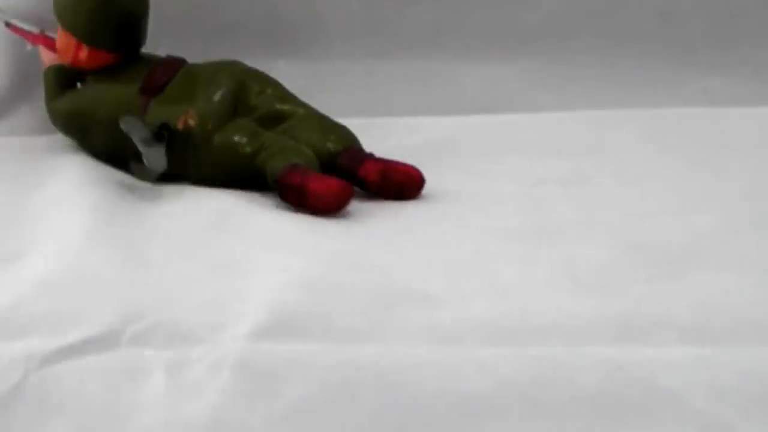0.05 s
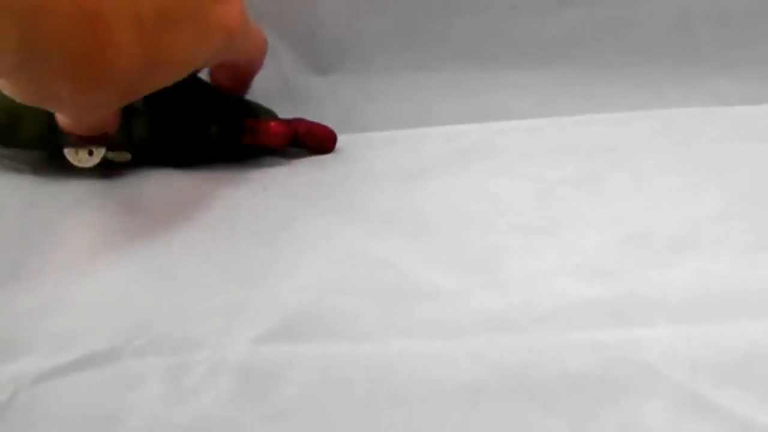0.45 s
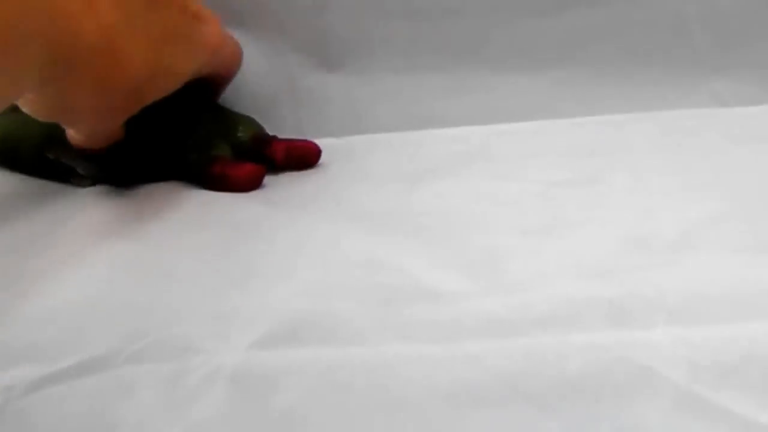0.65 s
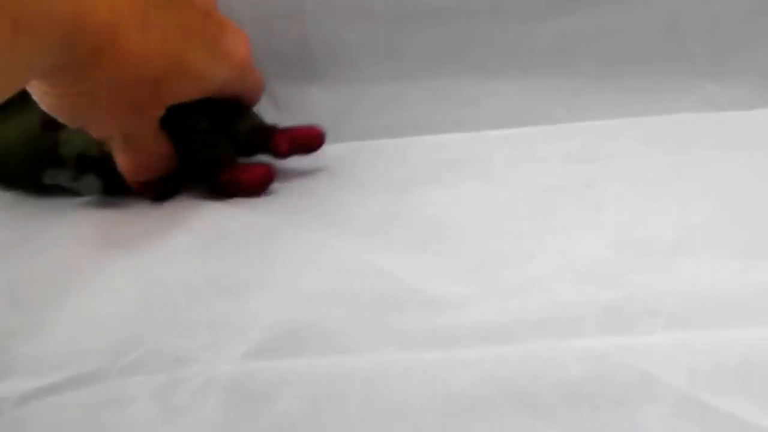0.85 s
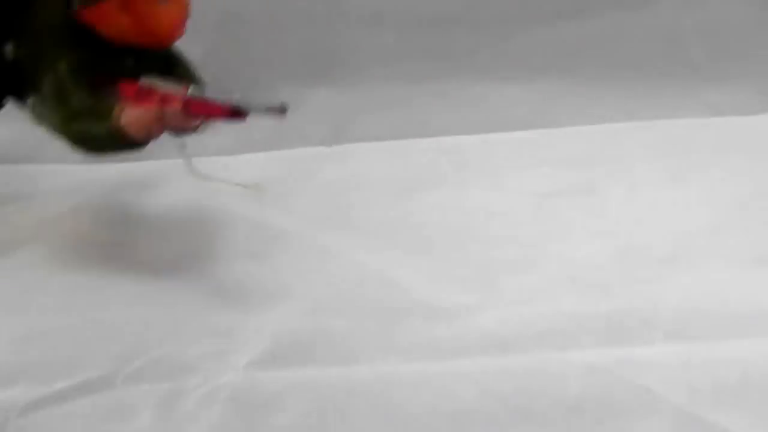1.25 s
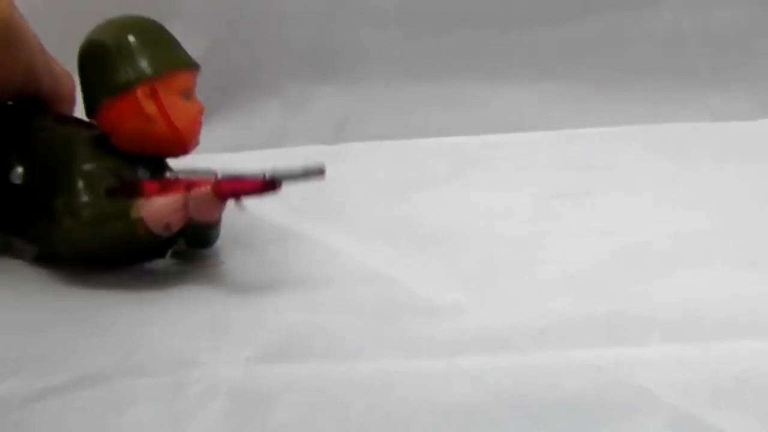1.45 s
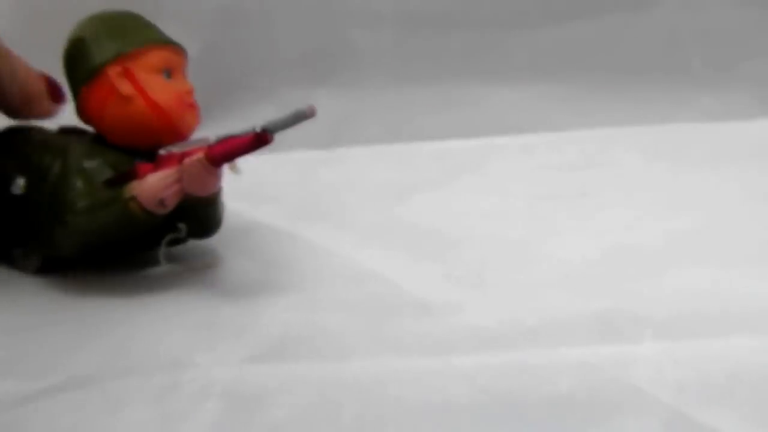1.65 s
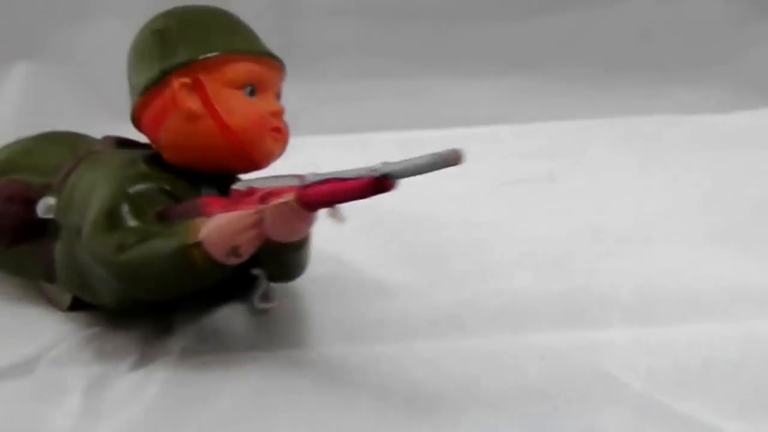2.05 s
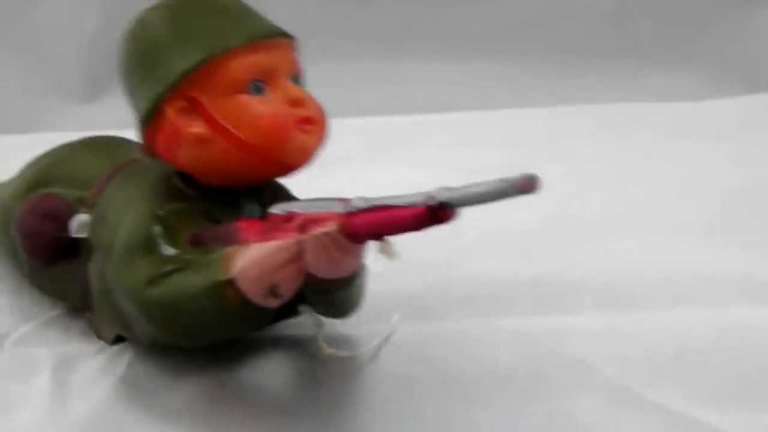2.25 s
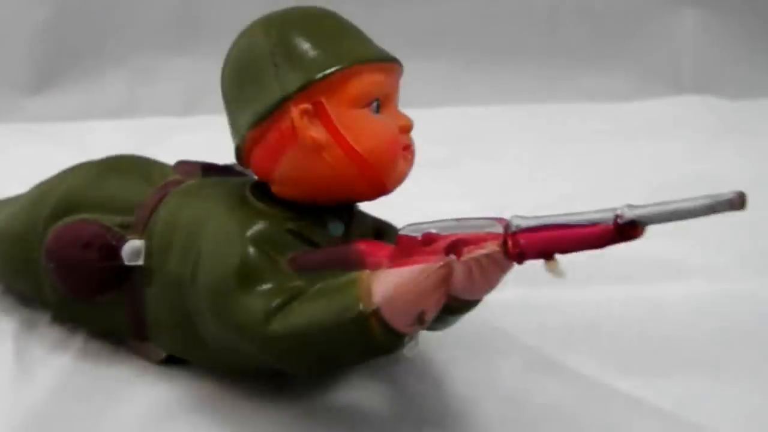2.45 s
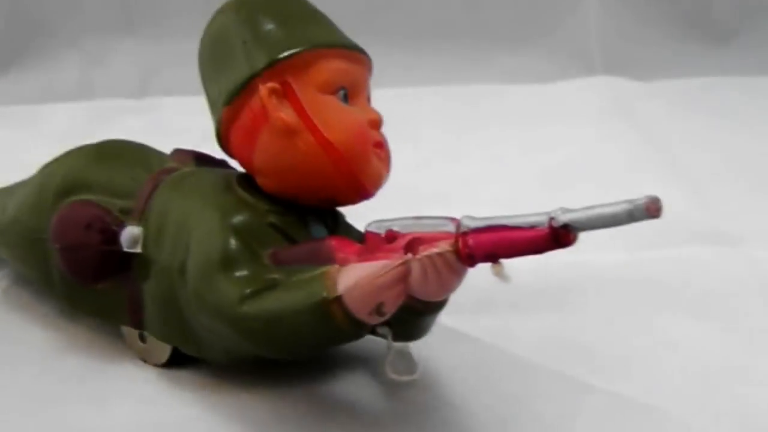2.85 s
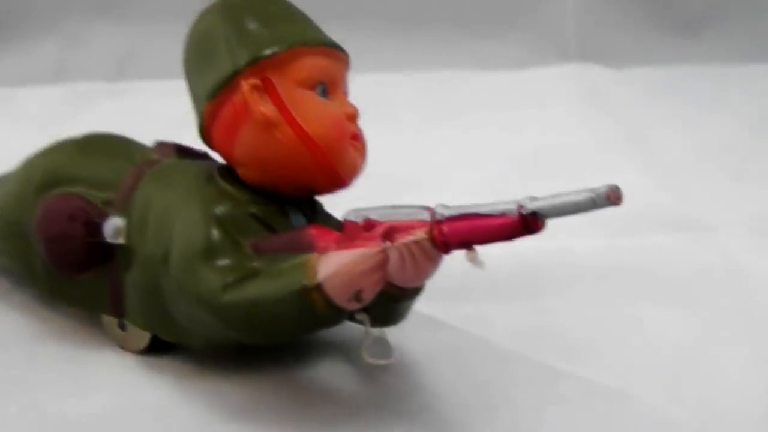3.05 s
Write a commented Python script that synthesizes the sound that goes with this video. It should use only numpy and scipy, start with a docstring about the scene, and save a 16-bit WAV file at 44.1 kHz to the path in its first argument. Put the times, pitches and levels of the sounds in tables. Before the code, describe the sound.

Close, uneven rattling of a wind-up toy running on cloth, broken by several loud clacks.

```python
"""A clockwork toy is gripped close to a microphone. Its works and underside make a dense, uneven rattle that
rings the hollow shell, with light knocks and soft bumps on a cloth. Near 0.9 s it is lifted and turned round:
the shell rings differently, and loose parts clack hard enough to overload the microphone. From 1.5 s it is
pushed across the cloth with yet another ring, a steady gear hum, thin squeals of rubbing parts and two more
clacks. The rattle dies away near 2.9 s, leaving a last faint knock and the hush of the room."""
import sys
import numpy as np
from scipy import signal
from scipy.fft import rfft, irfft
from scipy.io import wavfile

SR = 44100
rng = np.random.default_rng(int(sys.argv[2]) if len(sys.argv) > 2 else 0)


def transcribe(u):
    """Save the signal u as a 16-bit wav file named by the first command-line argument.

    u: samples, shape (n,) or (channels, n), limited to [-1, 1]; the rate is SR.
    q: integer samples, one column per channel.
    """
    v = np.clip(np.atleast_2d(u).T, -1, 1)
    q = np.round(v * 32767).astype(np.int16)
    wavfile.write(sys.argv[1], SR, q)


N = 136710
T, HZ = np.arange(N) / SR, np.fft.rfftfreq(N, 1 / SR)


def rattle():
    """Ticking and rubbing ring the hollow shell, which favours different pitches in each hold."""
    # strength of the rattle in each hold (time [s], treble level [dB], midrange level [dB])
    gripped = [(0.04, -69, -77), (0.14, -41.5, -48), (0.24, -21.0, -29), (0.28, -26.5, -32),
               (0.38, -19.5, -23), (0.44, -32, -40), (0.48, -31, -28), (0.5, -41.5, -42),
               (0.52, -28, -26.5), (0.6, -27.5, -35.5), (0.62, -40.5, -36.5), (0.66, -27, -32.5),
               (0.68, -34, -41), (0.72, -39, -37.5), (0.76, -40, -27), (0.78, -23, -29)]
    lifted = [(0.9, -29, -35), (0.92, -25.5, -32.5), (0.979, -22, -31), (1.0, -16, -29.7),
              (1.04, -26.5, -36), (1.059, -18, -37), (1.1, -22.5, -34), (1.14, -18.5, -33.5),
              (1.162, -27.5, -40), (1.28, -23.5, -35), (1.32, -33.5, -43.5), (1.34, -29, -37),
              (1.44, -20, -31), (1.46, -27, -34)]
    rolling = [(1.52, -31, -33), (1.54, -28, -41), (1.56, -22, -25.8), (1.579, -23.3, -40),
               (1.621, -23.5, -34), (1.68, -31.5, -33.5), (1.839, -22.7, -32), (1.86, -24.5, -28),
               (1.92, -23.5, -34), (1.938, -20, -21), (1.958, -20, -30.5), (2.06, -23.5, -32.5),
               (2.12, -24, -25.5), (2.201, -24.5, -29), (2.26, -18.5, -28.5), (2.28, -23.5, -23),
               (2.34, -19.5, -27.5), (2.36, -26.5, -29), (2.4, -23, -29.5), (2.42, -23, -25.5),
               (2.44, -25.5, -29), (2.56, -21.5, -27.5), (2.579, -17, -25.9), (2.642, -30, -39),
               (2.658, -17.5, -26), (2.718, -34, -37.8), (2.778, -23, -33.5), (2.799, -31, -38.5),
               (2.822, -21.5, -34), (2.838, -22, -31), (2.902, -52.5, -56), (2.936, -62.5, -65)]
    # broad tone colour in each hold (frequency [Hz], level [dB])
    gripped_colour = [(60, -29.5), (200, -10.5), (430, -12), (750, -1.5), (1100, -4), (1700, -5),
                      (2400, -5.5), (3100, -1.5), (4400, -2.5), (7500, -9)]
    lifted_colour = [(60, -31.5), (210, -21), (420, -12), (800, -5), (1500, 1.5), (2600, 2.5), (3600, 2.5),
                     (4200, -0.5), (6000, 2), (7500, -4.5)]
    rolling_colour = [(60, -25.5), (190, -11.5), (500, -9), (850, 0), (1650, -5), (2200, -3), (3400, 0),
                      (5100, -1), (6500, 0.5), (7500, -5)]
    # pitches at which the shell rings in each hold (frequency [Hz], width [Hz], boost [dB])
    gripped_shell = [(215, 60, 3), (734, 69, 4), (893, 70, 7), (1210, 39, 6), (1508, 40, 9),
                     (1890, 140, 6.5), (2096, 32, 10.5), (5760, 820, 6), (6740, 180, 8)]
    lifted_shell = [(903, 69, 6.2), (1072, 60, 9.9), (1450, 130, 6.9), (2080, 37, 3), (3600, 110, 2),
                    (5800, 110, 1.4), (6830, 310, 6)]
    rolling_shell = [(856, 36, 7), (913.5, 26.5, 11), (1250, 78, 9), (1540, 98, 5), (1926, 86, 10),
                     (2200, 64, 7.5), (2389, 57, 9.5), (2970, 170, 3.5), (3330, 45, 2), (3780, 110, 7),
                     (4247, 110, 6), (4540, 140, 3), (5770, 83, 3)]
    lift_s, land_s, change_s, split_hz = 0.933, 1.5, 0.055, 1830

    drive = shifting_contacts(ticks() + 0.49 * rng.standard_normal(N))  # the noise is the rubbing
    flutter_db = 1.5 * noise(HZ / (HZ + 15) / (1 + (HZ / 71.4) ** 2))  # the level flickers quickly
    when, treble_db, mid_db = np.vstack(gripped + lifted + rolling).T
    treble = drive * amp(np.interp(T, when, treble_db) + flutter_db - 0.5)
    mid = drive * amp(np.interp(T, when, mid_db) + 0.9 * flutter_db - 0.5)
    low_pass = 1 / (1 + (HZ / split_hz) ** 8)
    bands = [(mid, low_pass, (HZ > 600) & (HZ < 1400)), (treble, 1 - low_pass, (HZ > 1500) & (HZ < 7500))]

    # each hold fades into the next
    up, down = (np.clip((T - s) / change_s + .5, 0, 1) for s in (lift_s, land_s))
    holds = [(1 - up, gripped_colour, gripped_shell),
             (up * (1 - down), lifted_colour, lifted_shell),
             (down, rolling_colour, rolling_shell)]
    out = np.zeros(N)
    for share, broad, shell in holds:
        ring_db = sum(db / (1 + (2 * (HZ - hz) / width) ** 2) for hz, width, db in shell)
        gain = colour(broad) * amp(ring_db)
        force = 0
        for x, passed, band in bands:
            band_gain = np.sqrt(np.mean(gain ** 2 * band))  # divided out so the band keeps its level
            force += rfft(x * np.sqrt(share)) * passed / band_gain
        out += shaped(irfft(force, N), gain)
    return out


def ticks(per_second=2200, spread_db=2.5, smear_s=0.00056):
    """Tiny ticks come at random; each spreads for a moment as it travels through the shell."""
    sizes = amp(spread_db * np.minimum(rng.exponential(1, N), 4)) * rng.choice([-1, 1], N)
    hits = sizes * (rng.random(N) < per_second / SR)
    smear = rfft(rng.standard_normal(N) * np.exp(-np.minimum(T / smear_s, 50)))
    return unit(irfft(rfft(hits) * smear / (abs(smear) + 1e-12), N))


def shifting_contacts(x, depth_db=2.12, patch_s=0.073, patch_hz=310):
    """Contact points keep shifting, so patches of the tone colour swell and fade."""
    grid = signal.stft(x, nperseg=512, noverlap=384)[2]  # the sound laid out by frequency and time
    hz, seconds = np.arange(-20, 21) * SR / 512, np.arange(-60, 61) * 128 / SR
    blur = np.outer(np.exp(-(2 * hz / patch_hz) ** 2), np.exp(-(2 * seconds / patch_s) ** 2))
    patches = unit(signal.fftconvolve(rng.standard_normal(grid.shape), blur, "same"))
    return unit(signal.istft(grid * amp(depth_db * patches), nperseg=512, noverlap=384)[1][:N])


def clacks(rise_s=0.00087, push_s=0.00078, ring_decay_s=0.053):
    """A loose part strikes: a short bright chatter, a low push and the ring of the shell."""
    # hard strikes (time [s], level [dB], chatter decay [s], ring pitch [Hz],
    # ring against the level [dB], push level [dB], boost of the shared tones [dB])
    strikes = [(1.1665, -4, .022, 1540, -3, -49, 0), (1.3363, -2.5, .024, 1588, -8, -28, 0),
               (1.4796, -1.5, 0.025, 1490, -12, -25, 1.5), (1.6463, -1.5, 0.045, 1393, -10, -12, 0),
               (2.6991, -1, 0.036, 1477, -15, -35, -4.5)]
    # tone colour of the chatter (frequency [Hz], level [dB])
    chatter_colour = [(60, -12), (400, -16), (900, -21), (1500, -0.5), (2400, -7.5), (3400, 1),
                      (5000, -3.5), (5800, 3.5), (7500, -9.5)]
    # ringing tones that all strikes share (frequency [Hz], level against the strike [dB], decay [s])
    shared_tones = [(913, -24, 0.074), (1272, -18, 0.067), (1920, -15, 0.049), (3313, -15.5, 0.049),
                    (4370, -13.5, 0.04), (4810, -24, 0.049), (5720, 0.5, 0.02), (6270, -3, 0.024),
                    (7060, -19.5, .03)]
    out, chatter = np.zeros(N), noise(colour(chatter_colour))
    for start, db, decay, ring_hz, ring_db, push_db, boost_db in strikes:
        out += amp(db) * chatter * blow(start, rise_s, decay)
        age = np.maximum(T - start, 0) / push_s
        out += amp(push_db) * age * (2 - age) * np.exp(-age)  # one swing out and back
        tones = [(hz, level + boost_db, fade) for hz, level, fade in shared_tones]
        for hz, level, fade in tones + [(ring_hz, ring_db, ring_decay_s)]:
            out += amp(db + level) * np.sin(2 * np.pi * hz * (T - start)) * blow(start, rise_s, fade)
    return out


def knocks(rise_s=0.0005):
    """Handling gives light knocks, each a blend of a hollow body sound and a bright tick."""
    # light knocks (time [s], level [dB], decay [s], share of hollow sound [0-1])
    taps = [(.133, -40, .06, 0), (0.3399, -6.5, 0.034, 0.57), (.457, -12, 0.033, 0.8),
            (0.632, -17, 0.032, 0.46), (.691, -13, 0.032, .25), (0.742, -14, .04, 1), (0.75, -18, .04, 0.9),
            (1.046, -18, 0.055, 0), (1.605, -15, .015, 0.4), (2.649, -22, .04, 0.2), (2.821, -17, .04, 0.2),
            (2.877, -34, .035, 0.33), (3.068, -50, .05, .5)]
    # tone colours of the hollow body and the bright tick (frequency [Hz], level [dB])
    body_colour = [(60, -26), (300, -20.5), (550, -12.5), (850, 14), (1500, -5), (2500, 2.5), (5500, -4.5),
                   (7500, -13.5)]
    tick_colour = [(60, -26), (500, -12), (1500, -7), (3000, -5.5), (5500, 4), (7500, -4)]
    body, tick = noise(colour(body_colour)), noise(colour(tick_colour))
    out = np.zeros(N)
    for start, db, decay, hollow in taps:
        blend = np.sqrt(hollow) * body + np.sqrt(1 - hollow) * tick
        out += amp(db) * blow(start, rise_s, decay) * blend
    return out


def squeals():
    """The gears hum a steady, narrow tone, and rubbing parts sing in thin, rough tones that sag in pitch."""
    # gear hum and squeals (time [s], length [s], first pitch [Hz], last pitch [Hz], width [Hz], level [dB])
    rubs = [(1.546, 0.34, 910, 902, 32.3, -35.5), (2.011, .1, 4720, 4350, 220, -27.5),
            (2.081, 0.13, 4380, 4270, 240, -28), (2.474, .41, 2169, 2168, 96, -31.5)]
    out = np.zeros(N)
    for start, length, from_hz, to_hz, width, db in rubs:
        progress = np.clip((T - start) / length, 0, 1)
        phase = 2 * np.pi * np.cumsum(from_hz + (to_hz - from_hz) * progress) / SR
        narrow = 1 / (1 + (2 * HZ / width) ** 2)
        tone = unit(noise(narrow) * np.cos(phase) + noise(narrow) * np.sin(phase))
        swell = np.sqrt(abs(np.sin(np.pi * progress)))
        out += amp(db) * swell * tone
    return out


def bumps(rise_s=0.0023):
    """The body bumps on the cloth, which muffles the blow so that nothing rings."""
    # soft bumps (time [s], level [dB], decay [s])
    thuds = [(.305, -41, .26), (.742, -31, .21), (.786, -36, .19), (.996, -41, .12), (1.41, -31, .11),
             (2.268, -43, .2), (2.41, -37, .15)]
    # their dull tone colour (frequency [Hz], level [dB])
    thud_colour = [(30, -20.5), (90, -13.5), (210, 0), (330, -1), (600, -22.5), (1500, -49)]
    loudness = sum(amp(db) * blow(start, rise_s, decay) for start, db, decay in thuds)
    return noise(colour(thud_colour)) * loudness


def room_echo(x, level_db=-26, decay_s=0.35):
    """The room adds a faint, short tail to every sound."""
    tail = rng.standard_normal(N) * blow(0.0014, 0.0037, decay_s)
    return amp(level_db) * signal.fftconvolve(x, tail / np.linalg.norm(tail))[:N]


def room_air(level_db=-58, fade_in_s=0.21):
    """A low, steady hush fades in behind the toy."""
    # tone colour of the hush (frequency [Hz], level [dB])
    air_colour = [(24, -90), (40, -30.5), (146, -9.5), (209, -15), (240, -5.5), (294, -10.5), (352, -12),
                  (5720, -48), (9000, -59.5), (11700, -80), (19800, -120)]
    return amp(level_db) * noise(colour(air_colour)) * np.minimum(T / fade_in_s, 1) ** 2


def amp(db):
    """Turns decibels into a gain to multiply by."""
    return 10 ** (np.asarray(db) / 20)


def unit(x):
    """Scales a sound to an average strength (rms) of 1."""
    return x / np.sqrt(np.mean(x ** 2) + 1e-20)


def colour(points):
    """Gain at every frequency from a few (frequency [Hz], level [dB]) points."""
    hz, db = np.transpose(points)
    return amp(np.interp(np.log(HZ + 1), np.log(hz + 1), db))


def shaped(x, gain):
    """Filters with the given gain at every frequency; ringing follows a hit and never comes before it."""
    cepstrum = irfft(np.log(np.maximum(gain, 1e-5)), N)
    cepstrum[1:N // 2] *= 2
    cepstrum[N // 2 + 1:] = 0
    return irfft(rfft(x) * np.exp(rfft(cepstrum)), N)


def noise(gain):
    """Noise of strength 1 with the given tone colour."""
    return unit(irfft(rfft(rng.standard_normal(N)) * gain, N))


def blow(start, rise, decay):
    """Loudness of a hit: a quick rise, and a fall of 60 dB in `decay` seconds."""
    age = np.maximum(T - start, 0)
    return np.minimum(age / rise, 1) * np.exp(-np.minimum(np.log(1000) * age / decay, 50))


def scene():
    """The toy in a quiet room."""
    toy = rattle() + squeals() + clacks() + knocks() + bumps()
    air = room_air()
    fade_in = np.clip((T - .03) / .01, 0, 1)
    return (toy * fade_in + room_echo(toy) + air)[None]


def record(dry, notch_hz=8006, notch_width_hz=354, soften_hz=12000, top_hz=16200):
    """The microphone dulls the high treble, cuts a narrow notch in it and overloads on the clacks."""
    # how the microphone passes treble (frequency [Hz], level [dB])
    mic_treble = [(7000, 0.5), (7600, 3), (8500, -5), (9300, -13.5), (9900, -25.5), (10600, -55),
                  (12000, -99)]
    notch = 1 - 1.08 * np.exp(-((HZ - notch_hz) / notch_width_hz) ** 2)
    heard = shaped(dry[0], colour(mic_treble) * notch)
    overloaded = heard / (1 + abs(heard) ** 12) ** (1 / 12)  # peaks are rounded off below 1
    softened = irfft(rfft(overloaded) / np.sqrt(1 + (HZ / soften_hz) ** 8), N)
    top_cut = signal.firwin(255, top_hz, window=("kaiser", 8), fs=SR)
    return signal.oaconvolve(softened, top_cut, "same")[None]


dry = scene()
out = record(dry)
transcribe(out)
```